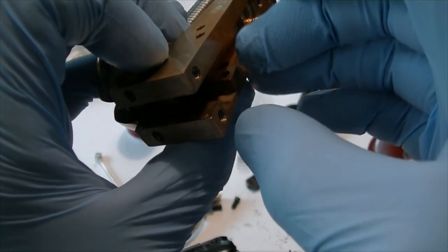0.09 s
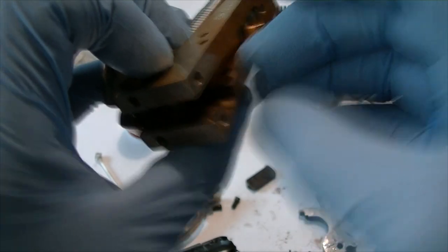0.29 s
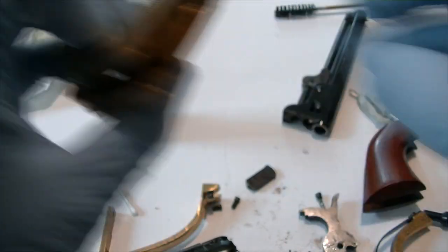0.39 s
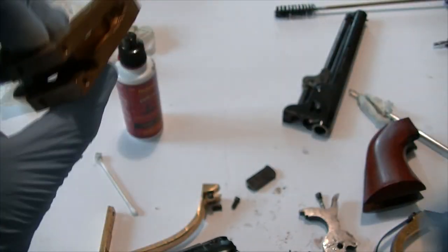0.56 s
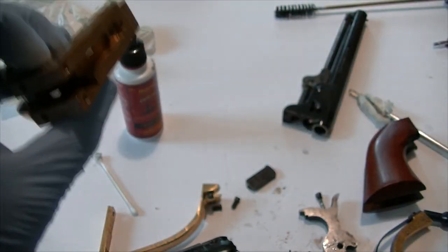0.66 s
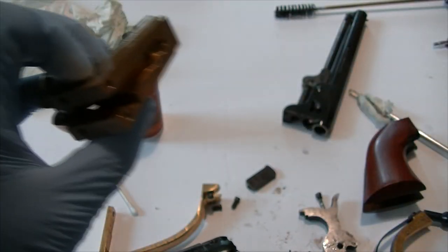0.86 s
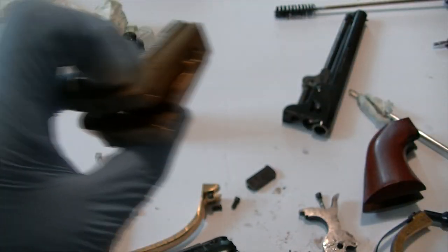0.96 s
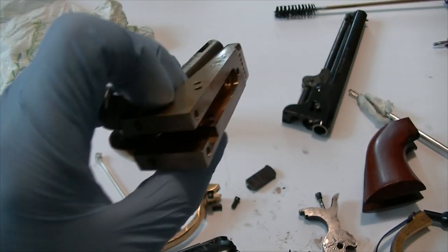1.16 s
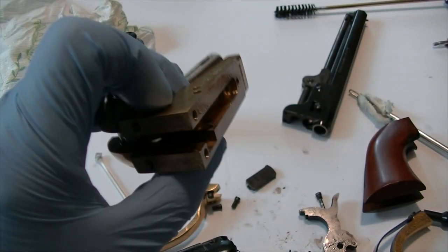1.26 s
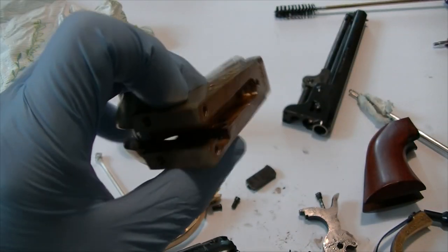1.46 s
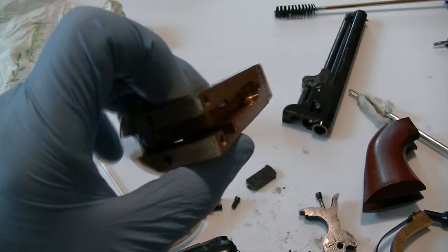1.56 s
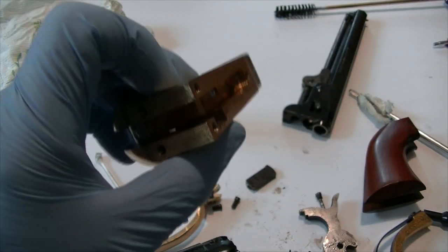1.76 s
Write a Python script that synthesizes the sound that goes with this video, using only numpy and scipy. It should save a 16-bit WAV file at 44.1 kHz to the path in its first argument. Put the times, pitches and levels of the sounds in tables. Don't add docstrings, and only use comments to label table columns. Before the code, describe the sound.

Hard metal clacks on a tabletop, several bounces and a short gritty slide, a soft wrist bump, then quieter glove creaks and metal clicks, heard very close in a small room with low appliance hum.

```python
import sys
import numpy as np
from scipy import signal
from scipy.fft import rfft, irfft
from scipy.io import wavfile
from scipy.ndimage import uniform_filter1d

SR = 44100
rng = np.random.default_rng(int(sys.argv[2]) if len(sys.argv) > 2 else 0)


def materialize(psi):
    bounded = np.clip(np.atleast_2d(psi).T, -1, 1)
    quanta = np.round(bounded * 32767).astype(np.int16)
    wavfile.write(sys.argv[1], SR, quanta)


def level_to_linear(level):
    exponent = np.asarray(level, float) / 20
    return 10 ** exponent


N = 79380
T = np.arange(N) / SR
T_RING = T[:SR // 2]


def norm(x):
    return x / np.sqrt(np.mean(x ** 2))


def curve(rows):
    time_s, level_db = np.transpose(rows)
    return np.interp(T, time_s, level_db, left=-120, right=-120)


def shape(x, points):
    freq_hz, gain_db = np.transpose(points)
    hz = np.fft.rfftfreq(x.shape[-1], 1 / SR) + 1
    gain = level_to_linear(np.interp(np.log(hz), np.log(freq_hz), gain_db))
    return irfft(rfft(x) * gain, x.shape[-1])


def butter(order, hz, kind="low"):
    return signal.butter(order, hz, kind, fs=SR, output="sos")


def soften(x, time_s):
    p = np.exp(-1 / (time_s * SR))
    return signal.lfilter([1 - p], [1, -p], x)


def walk(rate_hz):
    k = int(SR / rate_hz)
    steps = np.repeat(rng.standard_normal(N // k + 1), k)
    return 1.06 * uniform_filter1d(uniform_filter1d(steps, k), k)[:N]


def ring(modes, detune=0.):
    out = np.zeros(len(T_RING))
    for (hz, db, t60_s), j in zip(modes, np.broadcast_to(detune, len(modes))):
        decay = level_to_linear(db - 60 * T_RING / max(t60_s, .001))
        out += decay * np.sin(2 * np.pi * hz * (1 + j) * T_RING)
    return out


def add(out, start_s, x):
    i = int(start_s * SR)
    out[i:i + len(x)] += x[:N - i]


def grains(rate_hz, spread_db):
    hit = rng.random(N) < rate_hz / SR
    return norm(hit * rng.standard_normal(N) * level_to_linear(spread_db * rng.exponential(size=N)))


def patchy(x):
    lows = [signal.sosfiltfilt(butter(1, hz), x) for hz in 700 * 2. ** np.arange(5)]
    lows = [0 * x] + lows + [x]
    flicker_db = 2.2
    return sum(level_to_linear(flicker_db * walk(90)) * (b - a) for a, b in zip(lows, lows[1:]))


# freq_hz, gain_db
AIR = [(15, -63), (25, -92), (43, -27.5), (87, -20.5), (108, -13.5), (348, -9), (496, -19), (14000, -47),
       (16500, -69)]
# freq_hz, level_db
HUM = [(118.4, -65.5), (220.7, -55.5), (296.1, -61), (344.5, -54.5), (382.2, -65.5), (430.7, -59)]
AIR_DB, HUM_WIDTH_HZ = -48.5, 5.1


def hum():
    n = rng.standard_normal((3, N))
    apart = shape(n[1:], [(30, 16), (150, -5.5), (1500, 3.5), (8000, 7.5)])
    air = norm(shape(n[0] + apart, AIR)) * level_to_linear(AIR_DB - 1.5 + walk(4.7))
    lines = np.zeros(N)
    for hz, db in HUM:
        level = level_to_linear(db + 1.5 + 2.06 * walk(HUM_WIDTH_HZ * 3))
        drift = 0.28 * np.cumsum(walk(HUM_WIDTH_HZ * 2)) * HUM_WIDTH_HZ / SR
        lines += level * np.sin(2 * np.pi * (hz * T + drift + rng.random()))
    return air + lines


# freq_hz, gain_db
ROOM_COLOUR = [(59, -56), (100, -38), (185, -8), (389, -5), (481, -2.5), (634, -11), (2470, -14.5),
               (3320, -10), (16000, -31.5)]
ROOM_DB, ROOM_T60_LOW_S, ROOM_T60_HIGH_S, ROOM_DELAY_S = -12.5, 0.67, 0.58, 0.00067


def room(x):
    t = T[:SR]
    n = rng.standard_normal((3, SR))
    apart = shape(n[1:], [(300, -14.5), (3000, -5.0), (9000, 7.5)])
    n = shape(n[0] + apart, ROOM_COLOUR)
    low = signal.sosfilt(butter(2, 1500), n)
    tail = low * level_to_linear(-60 * t / ROOM_T60_LOW_S) + (n - low) * level_to_linear(-60 * t / ROOM_T60_HIGH_S)
    tail = tail * (1 - np.exp(-t / ROOM_DELAY_S))
    tail = tail / np.sqrt(np.sum(tail[0] ** 2))
    sent = shape(x, [(200, -4.5), (1000, -1.5), (3500, 1), (9000, 5.0)])
    return level_to_linear(ROOM_DB) * signal.fftconvolve(sent[None], tail, axes=1)[:, :N]


PORT_LAG_S, LEFT_DB, LEFT_TREBLE_DB, TREBLE_HZ = 2.5e-5, 1.15, -7, 8000
CASE_DB, CASE_S = -8.5, .0011


def ports(x):
    hz = np.fft.rfftfreq(N, 1 / SR)
    treble = 1 / (1 + (TREBLE_HZ / (hz + 1)) ** 4)
    db = (LEFT_DB + LEFT_TREBLE_DB * treble) / 2
    half = level_to_linear(db) * np.exp(-1j * np.pi * hz * PORT_LAG_S / (1 + (hz / 17000) ** 4))
    echo = level_to_linear(CASE_DB) * treble * np.exp(-2j * np.pi * hz * CASE_S)
    return irfft(rfft(x) * np.array([half * (1 + echo), (1 - echo) / half]), N)


# start_s, level_db
THUDS = [
    (0.721, -48.5),
    (0.791, -60),
]
# freq_hz, level_db, t60_s
THUD = [(90.3, -1, 0.28), (160, 7.5, 0.17), (197, 7.5, 0.21)]


def thuds():
    out = np.zeros(N)
    for start_s, db in THUDS:
        add(out, start_s, level_to_linear(db) * ring(THUD) * (1 - np.exp(-T_RING / 0.0012)))
    return out


STROKE_BEND, RELEASE_S = 1.1, .0015


def stroke(start_s, length_s, peak):
    end_s = start_s + length_s
    peak_s = start_s + length_s * np.clip(peak, .05, .95)
    u = np.interp(T, [start_s, peak_s, end_s], [0, np.pi / 2, np.pi])
    return soften(np.abs(np.sin(u)) ** STROKE_BEND * (T > start_s) * (T < end_s), RELEASE_S)


# start_s, length_s, peak_0_1, level_db, creak_rel_db
STROKES = [(1.099, 0.051, 1, -56, -16), (1.148, 0.109, 0.94, -41.5, -13), (1.259, 0.036, 0.17, -50, -9),
           (1.286, 0.036, 0.28, -46.5, -8.5), (1.312, 0.31, 0.02, -52.5, -13.5),
           (1.515, 0.098, 0.58, -41.5, -10.5), (1.596, 0.075, 0.12, -49, -14),
           (1.685, 0.054, 0.22, -44.5, -22), (1.726, 0.031, 0.17, -48, 2), (1.743, 0.019, 0.57, -43, -12),
           (1.754, 0.13, 0.1, -55, -7)]
# start_s, length_s, peak_0_1, level_db, pitch_hz
SQUEAKS = [
    (1.694, .028, .5, -44, 4200),
    (1.21, .05, .6, -48, 3700),
    (1.555, .05, .55, -48, 5000),
    (1.165, .05, .7, -53, 4300),
]
# time_s, level_db
SLIP = [(.030, -70), (.034, -45), (.040, -47), (.043, -78)]
# freq_hz, gain_db
RUB_COLOUR = [(1180, -22), (2000, -6), (2370, -10), (2980, -4), (4350, -2), (11000, -9), (15500, -22.5),
              (16100, -14), (16500, -44)]
GRIT_DB = -9


def gloves():
    grit = grains(14000, 1.2) + level_to_linear(GRIT_DB) * grains(250, 2.)
    hiss = norm(patchy(shape(grit, [(900, -40)] + list(RUB_COLOUR))))
    creak = [(300, -56), (800, 8.0), (1500, 1), (2500, -4.5), (6000, -34.0)]
    creak = norm(shape(grains(1500, 0.93), creak))
    slip = norm(shape(grains(2800, 1.3), [(6500, -15.0), (9500, 10), (15000, -26)]))
    out = level_to_linear(curve(SLIP)) * slip
    for start_s, length_s, peak, db, creak_db in STROKES:
        out += stroke(start_s, length_s, peak) * level_to_linear(db) * (hiss + level_to_linear(creak_db) * creak)
    for start_s, length_s, peak, db, hz in SQUEAKS:
        squeal = norm(signal.lfilter(*signal.iirpeak(hz, 9, SR), grains(4000, 1.0)))
        out += stroke(start_s, length_s, peak) * level_to_linear(db) * squeal
    return out


# start_s, level_db
PINGS = [
    (.0005, -50.5),
    (0.0154, -39),
]
# freq_hz, level_db, t60_s
SPRING = [(4323, 0, .13), (9720, -4, .035), (7160, -14, .06), (3100, -11, .07), (10600, -12, .04)]


def spring():
    out = np.zeros(N)
    for start_s, db in PINGS:
        add(out, start_s, level_to_linear(db) * ring(SPRING))
    return out


# time_s, level_db
SLIDE = [(.556, -48), (.575, -38.5), (.62, -41), (.665, -48), (.71, -55), (.76, -69)]
# freq_hz, gain_db
SLIDE_COLOUR = [(180, -14), (300, -17), (600, -6), (850, 10.5), (1250, -2.5), (2570, -2.5), (3350, 3.5),
                (8640, -7), (16000, -26)]


def slide():
    grit = grains(9000, 1.2) + level_to_linear(GRIT_DB) * grains(120, 1.5)
    return level_to_linear(curve(SLIDE)) * norm(patchy(shape(grit, SLIDE_COLOUR)))


FACE_DB, FACE_RING, FACE_RISE_S = 2.5, 1.86, 0.00016


def face(peaks, contact_s):
    modes = []
    for hz, width_hz, db in peaks:
        undo_contact = np.hypot(1, 2 * np.pi * hz * contact_s)
        level_db = db + FACE_DB + 20 * np.log10(width_hz / 300 * undo_contact)
        modes.append((hz, level_db, FACE_RING / width_hz))
    return (ring(modes[::2]) - ring(modes[1::2])) * (1 - np.exp(-T_RING / FACE_RISE_S))


def thin(x, knock_db):
    bright = signal.sosfiltfilt(butter(3, 1900, "high"), np.pad(x, (64, 0)), padlen=0)[64:]
    return bright + min(1., level_to_linear(knock_db + 24)) * (x - bright)


# freq_hz, width_hz, level_db
FLAT = [(1810, 310, -4), (3403, 210, -2), (4420, 230, -13), (4910, 64, -12.5), (6940, 290, -20),
        (7960, 420, -21), (9200, 570, -22.5)]
BOUNCE = [(2000, 140, -2.5), (2450, 250, -4.5), (3460, 100, -2.5), (4430, 150, -6.5), (6700, 220, -15),
          (8460, 500, -12.5)]
EDGE = [(1000, 200, -9), (2100, 450, -2.5), (3640, 280, -5), (4570, 320, -6.5), (7970, 160, -22),
        (9400, 230, -31), (11400, 350, -34)]
HEEL = [(993, 180, -1.5), (1750, 900, -19), (3300, 580, -6.5), (4360, 310, -9.5), (7640, 270, -27),
        (11000, 270, -31)]
TIP = [(910, 200, -4), (3260, 230, 0), (4900, 290, -14), (5900, 350, -11), (7400, 220, -22),
       (8200, 200, -12)]
CORNER = [(2190, 340, 2.5), (3540, 160, -1.5), (4500, 470, -6), (5300, 250, -13.5), (6430, 200, -7.5),
          (8030, 250, -11), (9200, 550, -15.5), (11700, 300, -26)]
# freq_hz, width_hz, level_db
PIN = [(2350, 89, 7), (3640, 180, 1), (5260, 250, -2)]
LATCH = [(1480, 87, 4), (3380, 610, 5), (4830, 220, -17), (8800, 360, -2), (11200, 380, -12)]
CATCH = [(2930, 470, 2.5), (4800, 520, 4), (6600, 160, -16), (8800, 590, 3.5), (11060, 290, 2)]
# start_s,
# crack_db, pitch_hz or face, knock_rel_db, treble_rel_db
KNOCKS = [(0.2223, -2.5, FLAT, -12, -15.5), (0.2342, -12, BOUNCE, -10.5, -12), (.2445, -21, 3500, -45, -30),
          (.4275, -33, 3300, -45, -30), (0.4063, -9, EDGE, -15, -12), (0.4174, -5.5, HEEL, -24, -14.5),
          (0.5276, -19.5, TIP, -20, -7), (0.554, -10.5, CORNER, -60, -10.5), (0.5612, -19.5, 3400, -38, -3),
          (0.5651, -20, 990, -22, -10), (0.5878, -29, 5300, -40, -3), (.5725, -32, 3540, -10.5, -10),
          (.577, -35, 3600, -20, -18), (.602, -33, 2100, -3.5, -15), (.6445, -41, 8600, -24, -3),
          (.66, -32, 3500, -26, -6), (.6665, -36, 6000, -36, -6), (0.6093, -26.5, 9000, -11.5, -3),
          (0.6263, -29.5, 1260, -32, 6), (0.6373, -31, 1160, -7, -6), (0.6504, -31.5, 1200, -3.5, -24),
          (0.7229, -38, 953, -39, -27)]
# start_s, crack_db, pitch_hz or face, knock_rel_db, treble_rel_db
TICKS = [(0.155, -37, 2100, -38, -12), (0.4744, -23, 1340, -17, -32), (0.8499, -38.5, PIN, -22, -20),
         (.789, -38, 1150, -17, -35.5), (.817, -42, 1290, -6.5, -23), (.832, -50, 1500, -33, -23),
         (.846, -35.5, 1200, -14, -30), (1.1068, -33, 2960, -39, -11), (1.1328, -34, 3180, -30, -17),
         (1.14, -40, 3300, -38, -7), (1.1881, -25.5, LATCH, -16, -2), (1.3359, -39, 1660, -15, -1),
         (1.5295, -44, 5000, -23, 8), (1.5473, -42.5, 4930, -1, -1), (1.6265, -32, 3000, -44, -20),
         (1.6435, -35, 3500, -27, -18), (1.726, -27, CATCH, -13, 19)]
# freq_hz, level_db, t60_s
METAL = [(1980, 13.5, 0.0019), (3180, 8.5, 0.004), (4700, -2, 0.0057), (3020, -5, 0.0028)]
TREBLE = [(6370, -18, 0.0091), (7600, 1.5, 0.0046), (13000, -34, .003)]
TABLE = [(255.7, 0.5, 0.15), (398, -2.5, 0.15), (451, -3.5, 0.043), (660, -3.5, 0.17), (811, 3, 0.13),
         (1008, -6, 0.05), (1340, 3, 0.014)]
CONTACT_S, TICK_CONTACT_S, TICK_DB = .00008, .00003, -6
SETTLE_S, REBOUND_S, REBOUND_DB = 0.0009, 0.00093, -5.5
CRACK_T60_S, SPLASH_T60_S, KNOCK_DB = .009, 0.0075, -8.5
FILL_DB, FILL_S, FACE_ROOM_DB, KICK_S = -3.5, 0.00023, -7, 0.00018
SPLASH_COLOUR = [(2500, -8), (5000, 4.0), (9000, -2.5), (12000, 1.5), (16000, -18)]


def contacts(rows, contact_s, sign):
    near, blow = np.zeros((2, N))
    for start_s, db, pitch, knock_db, treble_db in rows:
        at_s = start_s + SETTLE_S
        c = rng.standard_normal(24)
        treble_db = min(treble_db, -3.)
        has_face = not np.isscalar(pitch)

        splash = shape(rng.standard_normal(2048), SPLASH_COLOUR) * level_to_linear(-60 * T[:2048] / SPLASH_T60_S)

        crack = ring([(METAL[0][0] if has_face else pitch, 0, CRACK_T60_S)])
        crack += ring(METAL[::2], .03 * c[:2])
        crack += (1 if has_face else -1) * ring(METAL[1::2], .03 * c[2:4])
        crack += level_to_linear(treble_db + 12) * ring(TREBLE, .07 * c[4:7])
        crack = thin(crack, knock_db)
        if has_face:
            own = thin(face(pitch, contact_s), knock_db)
            add(near, at_s, sign * level_to_linear(db) * own)
            add(blow, at_s, level_to_linear(db + FACE_ROOM_DB) * own)
            crack = level_to_linear(FILL_DB) * crack * np.exp(-T_RING / FILL_S)

        rebound_s = REBOUND_S * (1 + 0.11 * c[7])
        add(near, at_s + rebound_s, sign * level_to_linear(db - 7.0 + REBOUND_DB) * crack)

        table = [(hz, g + 4.06 * v, t60_s) for (hz, g, t60_s), v in zip(TABLE, c[8:])]
        knock = level_to_linear(knock_db + KNOCK_DB + 9) * ring(table, 0.014 * c[16:23])
        add(near, at_s, sign * level_to_linear(db - 7.0) * (crack + knock))
        add(near, at_s, level_to_linear(db + treble_db + 9.5) * splash)
        kick = crack * np.exp(-T_RING / KICK_S) + 0.35 * knock * np.exp(-T_RING / 0.043)
        add(blow, at_s, level_to_linear(db + 1.5) * kick)
    return soften(np.array([near, blow]), contact_s)


MIC_LOW_HZ, MIC_TOP_HZ = 193, 15700


def scene():
    knocks = contacts(KNOCKS, CONTACT_S, sign=1)
    ticks = level_to_linear(TICK_DB) * contacts(TICKS, TICK_CONTACT_S, sign=-1)
    hits, blows = knocks + ticks
    soft = gloves() + slide() + spring()
    near = ports(hits + soft) + room(blows + 0.19 * soft)
    return signal.sosfilt(butter(4, MIC_LOW_HZ, "high"), near) + thuds() + hum()


def low_pass(x):
    return signal.sosfilt(signal.butter(12, 16640, fs=SR, output="sos"), x)


def record(dry):
    top_cut = signal.ellip(8, .3, 70, MIC_TOP_HZ, fs=SR, output="sos")
    mix = signal.sosfilt(top_cut, np.clip(dry, -.97, .97))
    return low_pass(mix)


dry = scene()
out = record(dry)
materialize(out)
```